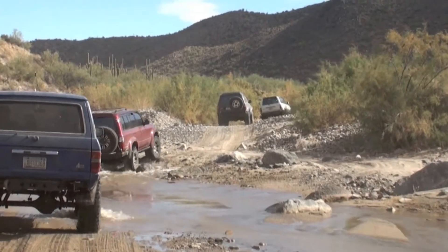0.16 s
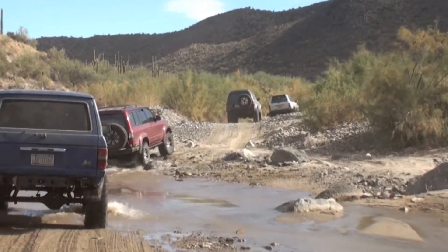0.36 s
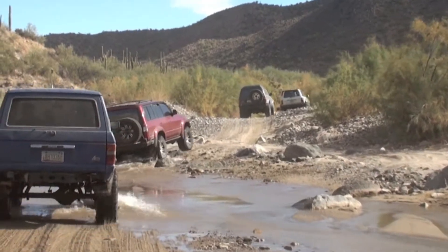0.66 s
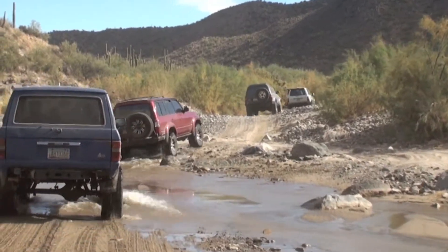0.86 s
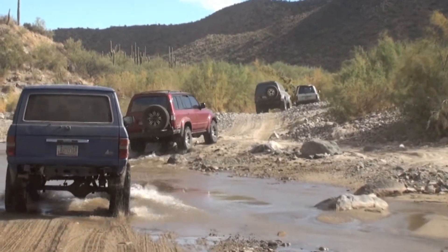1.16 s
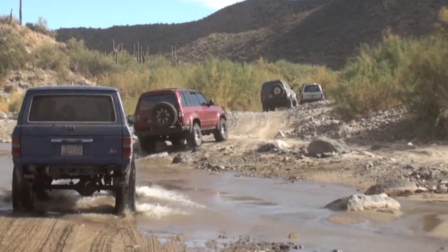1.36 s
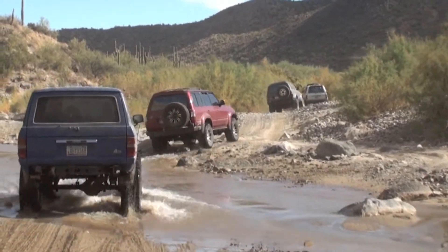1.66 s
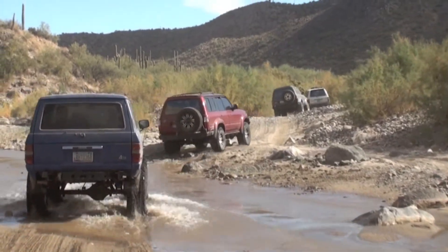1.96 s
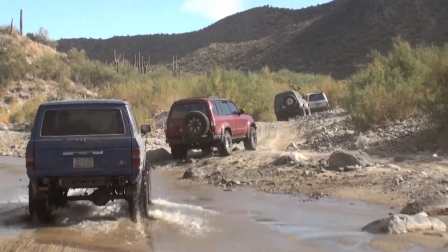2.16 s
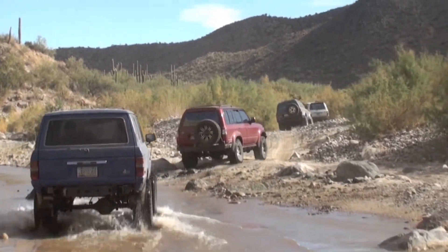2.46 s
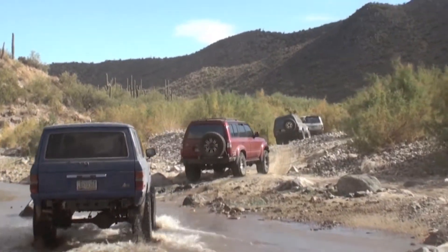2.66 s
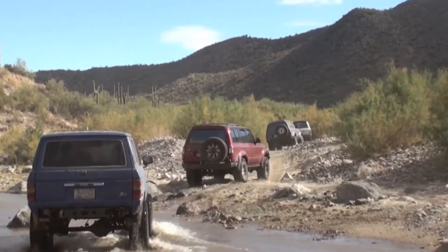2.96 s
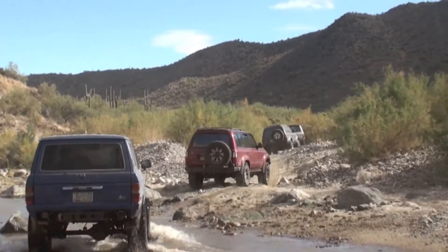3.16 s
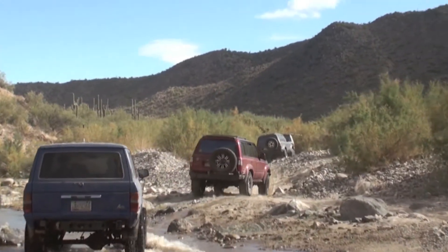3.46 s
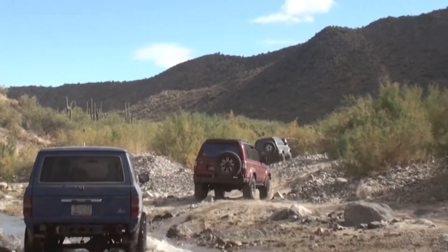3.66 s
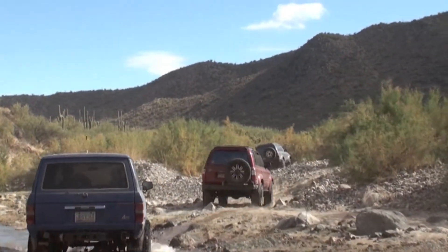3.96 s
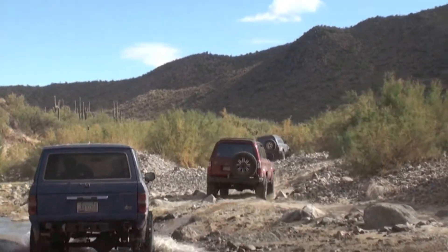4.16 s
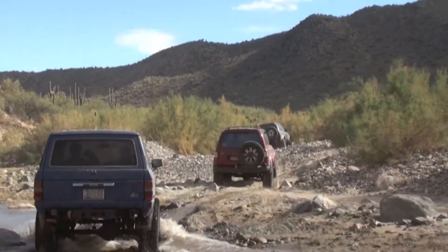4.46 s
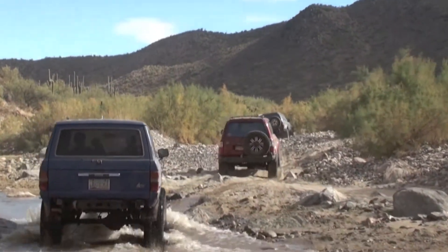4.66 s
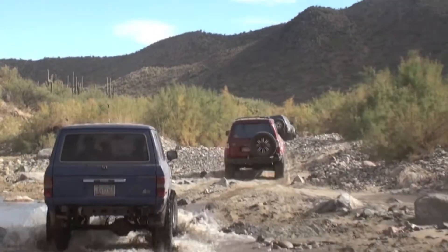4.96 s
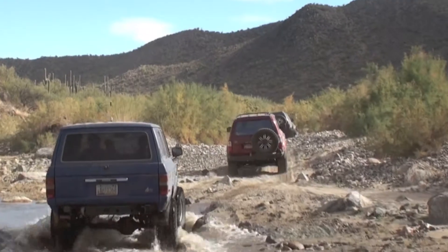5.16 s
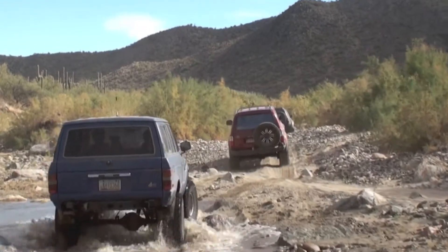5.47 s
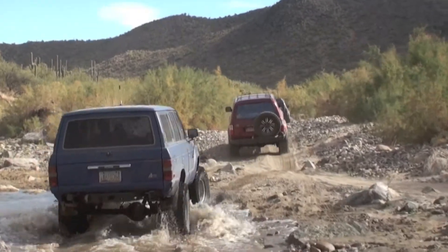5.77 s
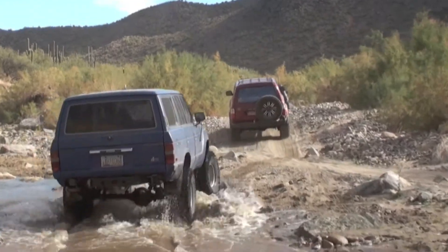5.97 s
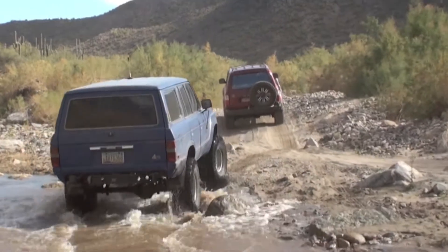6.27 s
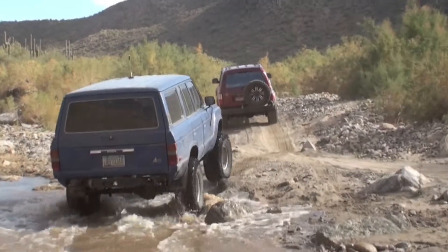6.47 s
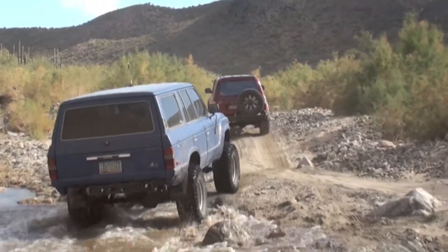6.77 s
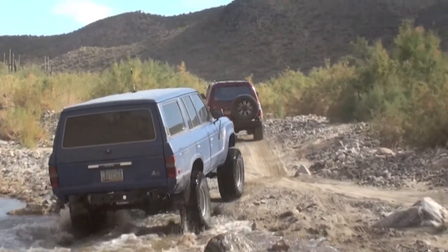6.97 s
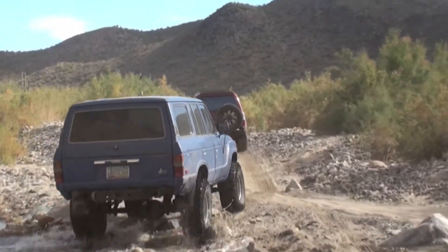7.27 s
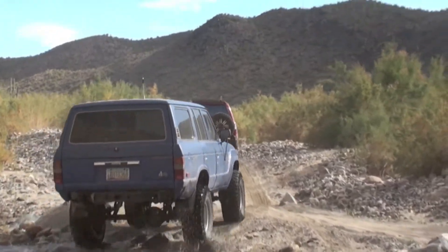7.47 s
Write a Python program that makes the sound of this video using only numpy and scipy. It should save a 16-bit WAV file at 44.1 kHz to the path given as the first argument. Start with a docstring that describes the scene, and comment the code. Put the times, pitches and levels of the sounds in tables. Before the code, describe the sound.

Inside the small, dry cabin of a four-wheel-drive crawling through a stony, shallow stream, in close stereo leaning slightly left. A low engine drone starts a little jerky, dips near 0.7 seconds, then swells and smooths, its pitch jumping around 1.5 and climbing until about 5, where it levels, wavers and gradually weakens. Floor rumble, a soft rush of tyres and water, faint air hiss and fine gritty spatter continue throughout. A small cluster of trim ticks comes at 1.1 to 1.3, with a knock at 1.5. From 2.4 bright ticks multiply; between 3.2 and 4.6 panel knocks crowd together over heavy low booms and louder ground noise. Short hollow tocks slide downward at 3.5, 4.3, 5.6 and 6.4, with tiny metal clinks near 4.1, 5.2 and 5.7. Scattered rattles, knocks at 6.1 and 7, and deep jolts persist until the end at 7.6.

```python
"""Inside a four-wheel-drive car that crawls over the stones of a river bed, in order of time.
From the start the engine drones as sine lines that climb with its speed, over filtered noise of floor, tyres,
water and air, spattering grains and a low boom that swells at each jolt. Loose trim ticks and body panels knock
as struck modes, at random and in set blows. From midway, falling tocks, hollow and slightly rough, mix with
a few clinks of small metal parts."""
import sys
import numpy as np
from scipy import signal
from scipy.fft import rfft, irfft, next_fast_len
from scipy.io import wavfile
from scipy.ndimage import uniform_filter1d, map_coordinates

SR = 44100
rng = np.random.default_rng(int(sys.argv[2]) if len(sys.argv) > 2 else 0)


def wav_record(signal):
    """Record a signal, one row per channel, as 16-bit PCM in the file named by sys.argv[1]."""
    frames = np.transpose(np.atleast_2d(signal))
    bounded = np.clip(frames, -1, 1)
    # unit amplitude maps onto the largest positive 16-bit level
    quanta = np.round(bounded * 32767).astype(np.int16)
    wavfile.write(sys.argv[1], SR, quanta)


N = 335601  # samples

# All table levels are relative; the mix sets the final gain.
# Engine speed. Each row: time in seconds, firing rate in Hz.
ENGINE_SPEED = [(0, 38.6), (.7, 40.6), (1.1, 42.2), (1.42, 43.8), (1.56, 47.6), (1.7, 50), (2.2, 53.6),
                (2.8, 56.7), (3.2, 57.9), (3.45, 59.1), (3.9, 60.6), (4.5, 62.3), (5.0, 63.5), (5.7, 62.7),
                (7.61, 63.3)]
# Engine load. Each row: time in seconds, level in dB, jerkiness from 0 to 1,
# gain of the upper multiples in dB, level of the in-between multiples in dB.
ENGINE_LOAD = [(0, -23, 1, 0, -45), (.35, -29, 0.7, 0, -45), (.7, -32, .1, 5, -46), (1.1, -27, 0, 2, -48),
               (1.42, -23, 0, -5, -47), (1.65, -25, 0, -5, -47), (1.79, -22, 0, -6, -47),
               (1.92, -24, 0, -1, -47), (2.2, -24, 0, 0, -42), (2.9, -25, 0, 0, -43),
               (3.4, -24, .2, 0, -43), (3.55, -27, .3, 2, -44), (4.2, -27.5, .4, 0, -39),
               (4.5, -30, .5, 0, -44), (5.0, -27, .6, -6, -47), (5.6, -29, .8, -6, -49),
               (6.4, -30, .9, -8, -44), (7.61, -34, .7, -6, -47)]
# Engine lines. Each row: multiple of the firing rate, level in dB.
WHOLE_MULTIPLES = [(1, 0), (2, 0), (3, -3), (4, 0), (5, -5), (6, -6)]
# In-between lines, from unequal cylinders. Each row: multiple of the firing rate, level in dB.
HALF_MULTIPLES = [(1.5, 0), (2.5, 0), (3.5, -2), (4.5, -4)]
# How the car body passes the engine's lines on. Each row: frequency in Hz, gain in dB.
BODY_SHELL = [(39, -14), (42, 0), (46, 1), (49, 2.5), (52, 0), (57, -3), (59.5, -11), (64, -14), (82, -14),
              (87, -9), (100, -6.5), (113, -10.5), (122, -9.5), (128, -13), (150, -24), (166, -21),
              (177, -15), (188, -28), (200, -17), (218, -12), (232, -28), (250, -23), (268, -15),
              (280, -15), (290, -9), (297, -11), (303, -21), (311, -12), (322, -10), (336, -11), (345, -24)]
# Ground noise. Each row: time in seconds, floor pan in dB, tyres and water in dB, air hiss in dB.
GROUND_LEVELS = [(0.0, -32, -42.5, -62), (0.3, -34.5, -43, -62.5), (1.1, -29.5, -43, -62),
                 (2.2, -29.5, -42, -62.5), (3.1, -28, -42, -60), (3.35, -24, -39, -58),
                 (3.69, -27, -41.5, -58), (4.24, -23, -38.5, -54.5), (4.56, -28, -41, -58.5),
                 (5.49, -32, -41.5, -61.5), (6.32, -28, -40.5, -58), (6.61, -31, -39.5, -60),
                 (7.2, -25.5, -39.5, -57.5), (7.61, -33, -40, -59)]
# Colour of the floor pan. Each row: frequency in Hz, density in dB per Hz.
PAN_SPECTRUM = [(12, -45), (20, -3.5), (48, -4), (72, -6), (97, -8), (145, -7), (176, -14.5), (225, -16.5),
                (325, -18), (381, -29.5), (439, -23.5), (600, -35), (780, -64), (1320, -120)]
# Colour of tyres and water. Each row: frequency in Hz, density in dB per Hz.
TYRE_SPECTRUM = [(150, -28), (250, -2.5), (413, -3.5), (511, -8), (726, -8), (898, -12), (1260, -13.5),
                 (1830, -21.5), (2270, -21.5), (2840, -26), (5000, -35), (6500, -40), (11000, -120)]
# Colour of the air hiss. Each row: frequency in Hz, density in dB per Hz.
AIR_SPECTRUM = [(1800, -38), (3000, -26), (3800, -22), (4500, -11.5), (6300, -9.5), (7600, -7.5),
                (10000, -11.5), (11800, -11.5), (13500, -12.5), (15300, -15.5), (16500, -39)]
# Stereo width of the noise. Each row: frequency in Hz, left-right likeness (1 is mono).
LIKENESS = [(60, 0.96), (99, 1), (160, 0.77), (270, 0.66), (450, 0.79), (740, 0.64), (1220, 0.75),
            (2010, 0.7), (3330, 0.65), (5500, 0.64), (10300, 0.61), (11600, 1)]
# Steady booming. Each row: time in seconds, cabin air in dB, sprung body in dB.
SWAY_LEVELS = [(0, -57, -42), (.7, -48, -48), (1.1, -57, -35), (2.3, -29, -45), (3, -39, -41),
               (3.3, -30, -28.5), (4.7, -26.5, -28), (5.6, -30, -35.5), (7.61, -26.5, -27.5)]
# Jolted wheels. Each row: centre in seconds, cabin air in dB, sprung body in dB,
# length in seconds, pitch of the cabin air in Hz.
WHEEL_JOLTS = [(0.126, -42, -29, 0.053, 41), (0.464, -30, -46, 0.066, 41.05),
               (0.902, -26, -26, 0.07, 40.95), (2.52, -18, -46, 0.049, 43.25), (2.648, -50, -38, 0.049, 44),
               (3.32, -25.5, -32, 0.12, 47.64), (3.512, -20.5, -16.5, 0.064, 43.94),
               (3.81, -22, -31, 0.046, 46), (4.01, -25, -20, 0.058, 48), (4.17, -14.5, -28, 0.036, 41),
               (4.265, -18, -19, 0.035, 41), (4.448, -20, -25.5, 0.061, 43), (4.654, -25.5, -34, 0.088, 42),
               (4.962, -17, -25.5, 0.082, 41.96), (5.25, -24, -30, 0.069, 40.87),
               (6.213, -23, -33, 0.068, 44.82), (6.564, -27, -25.5, 0.042, 38),
               (6.858, -18.5, -23, 0.061, 45), (7.128, -17, -26.5, 0.057, 45),
               (7.493, -35, -32, 0.12, 38.3)]
# Resonance of the cabin air. Each row: frequency in Hz, density in dB per Hz.
CABIN_AIR = [(20, -54), (34, -15), (40, -1.5), (43, 1.5), (47, -10), (54, -4.5), (90, -120)]
# Resonance of the body on its springs. Each row: frequency in Hz, density in dB per Hz.
SPRUNG_BODY = [(8, -40), (18, -14), (27, 5), (33, 1.5), (44, -15), (80, -120)]
# Ticks of loose trim. Each row: blow in seconds, peak in dB, treble gain in dB, mode struck hardest in Hz.
TRIM_TICKS = [(0.0169, -32, -15, 5650), (1.1218, -24, -8, 3800), (1.1998, -29.5, -5, 5650),
              (1.2179, -26, -11, 5650), (1.2473, -29.5, -7, 5650), (1.4962, -33.5, -13, 3800),
              (2.4076, -35, -3, 8600), (2.4766, -19.5, -4, 5650), (2.5324, -30.5, -6, 5100),
              (2.6327, -28.5, -5, 8600), (2.6483, -30, -8, 6700), (2.6849, -31.5, -8, 6700),
              (2.7384, -33, -2, 7500), (2.7674, -25.5, -9, 5650), (2.7813, -31, -5, 7500),
              (2.7977, -28, -7, 5650), (2.9247, -28.5, -9, 5650), (3.1832, -33, -9, 3800),
              (3.2752, -28, -15, 3800), (3.2848, -34, -9, 6700), (3.3849, -24, -4, 6700),
              (3.4187, -38, -2, 3800), (3.4823, -32, -7, 6700), (3.5403, -31, -15, 6700),
              (3.6355, -29.5, -1, 6700), (3.6688, -35, -10, 6700), (3.6893, -29, -3, 4400),
              (3.7286, -31, -7, 4400), (3.7944, -28.5, -11, 4400), (3.8659, -34, -9, 6700),
              (3.884, -29, -7, 5100), (3.9236, -28.5, -10, 6700), (3.9522, -32, -5, 5100),
              (4.0609, -36, -6, 5650), (4.1682, -38, -12, 5650), (4.2146, -31, -13, 3800),
              (4.2681, -37.5, -3, 5650), (4.2805, -40, -5, 6700), (4.3061, -35, 1, 3800),
              (4.3346, -32, -7, 6700), (4.3788, -37, -4, 7500), (4.4339, -37, -12, 7500),
              (4.6013, -33, 0, 5650), (4.7649, -31.5, -2, 5650), (4.7976, -31.5, -4, 5650),
              (4.8384, -40, -4, 6700), (4.8921, -34, -6, 6700), (4.9525, -30.5, -8, 6700),
              (5.0053, -29, -7, 6700), (5.0881, -28.5, -7, 6700), (5.1046, -28, -5, 6700),
              (5.2228, -28.5, -1, 6700), (5.2612, -27.5, -5, 6700), (5.4054, -36, -11, 4400),
              (5.5047, -33, -14, 3800), (5.522, -34, -3, 8600), (5.7558, -28.5, -3, 5650),
              (5.9658, -31, -9, 5650), (6.017, -40, -9, 5100), (6.0347, -33.5, -2, 3800),
              (6.0967, -27.5, -16, 3800), (6.1331, -26.5, -8, 6700), (6.2125, -29.5, -7, 5650),
              (6.2373, -34, -7, 3800), (6.3559, -37, -3, 3800), (6.5909, -37, -9, 5650),
              (6.839, -38, -13, 5100), (6.9172, -33.5, -10, 3800), (6.9522, -28, -3, 6700),
              (6.9896, -26.5, -1.5, 5650), (7.0339, -31.5, -12, 7500), (7.2653, -33.5, -5, 3800),
              (7.4536, -32, -13, 6700), (7.58, -31.5, -4, 5650)]
# Ring of the trim. Each row: frequency in Hz, level in dB.
TRIM_MODES = [(2000, 0.5), (2450, 0), (3100, -5), (3800, -0.5), (4400, -7), (5100, -0.5), (5650, 0),
              (6700, 1), (7500, 0), (8600, -3), (9500, 0), (10400, 0), (11300, 4), (12500, -3), (13700, -4),
              (15100, -18)]
# Knocks of the body. Each row: blow in seconds, peak in dB, upper-mode gain in dB, mode struck hardest in Hz.
BODY_KNOCKS = [(1.497, -24.5, -3, 2800), (2.947, -25, -12, 1850), (3.184, -31.5, 1, 3600),
               (3.278, -23, 0, 1450), (3.346, -38, -8, 2800), (3.45, -36, -13, 1450), (3.69, -29, 0, 4400),
               (3.92, -38, -10, 2050), (3.948, -30, -8, 1450), (4.028, -37, -6, 2050),
               (4.076, -30, 3, 3600), (4.106, -40, -10, 1450), (4.129, -35, -8, 2050),
               (4.146, -29, -3, 2450), (4.192, -39, -5, 2050), (4.214, -23, -2.5, 2050),
               (4.225, -31, -11, 2050), (4.281, -26, -18, 600), (4.311, -29.5, -13, 1450),
               (4.367, -28, -20, 1450), (4.432, -36, -17, 1450), (4.476, -29, -3, 3600),
               (4.536, -29.5, -26, 600), (5.965, -30, -19, 4400), (6.087, -33, -6, 2450),
               (6.098, -23.5, -6, 3600), (6.216, -29.5, -15, 1450), (6.673, -29.5, 3, 3600),
               (7.034, -26, -6, 1850), (7.265, -33, -9, 2050), (7.455, -27, 1, 2800)]
# Ring of the body panels. Each row: frequency in Hz, level in dB.
BODY_MODES = [(600, 15.5), (800, 7.5), (950, -1), (1150, -12), (1450, 11), (1850, 9), (2050, 5), (2450, 12),
              (2800, 3), (3100, 3), (3600, 2), (4400, -13)]
# Hollow falling tocks. Each row: start in seconds, level in dB, starting pitch in Hz, final pitch in Hz.
FALLING_TOCKS = [(3.51, -39, 1400, 1120), (4.306, -35, 2520, 1300), (4.362, -38, 2470, 1300),
                 (5.6, -30, 1600, 760), (6.423, -39, 1200, 1040)]
# Clinks of small metal parts. Each row: blow in seconds, peak in dB, top-mode gain in dB (idle: no mode
# is above the split), mode struck hardest in Hz.
METAL_CLINKS = [(4.1352, -23.5, -14, 11600), (5.1581, -26.5, -11, 14900), (5.662, -34, -6, 8750),
                (5.6722, -24.5, -6, 8750)]
# Ring of the metal parts. Each row: frequency in Hz, level in dB.
METAL_MODES = [(5200, -13), (7200, -8), (8750, 0.5), (9700, -2), (10600, -15), (11600, 1), (12400, -6),
               (13500, -13), (14300, -10), (14900, -1), (15500, -6)]
# Decay of the cabin. Each row: frequency in Hz, time to fall 60 dB in seconds.
CABIN_DECAY = [(500, 0.049), (4000, 0.12), (15000, 0.016)]

SMEAR_DB = 3  # lost under full jerk by each multiple above the second
HALF_GROWS_DB, HALF_FULL = 11, 0.17  # upper in-between lines rise with jerk, complete at this jerk
SPRUNG_HZ = 26.5  # swing of the body on its springs
# Spatter: median pitch, its spread in natural log units, decay in cycles, level at the largest size draw
SPATTER_HZ, SPATTER_SPREAD, SPATTER_CYCLES, SPATTER_DB = 1500, .7, 1.5, -49
LEAD_S, LEAD_DB = .003, -10.5  # brief soft noise rise into a blow
PRESS_DB, PRESS_T60 = -19, .03  # short grind after it, seconds to fall 60 dB
HARDEST_DB = 4  # gain of the mode struck hardest
TRIM_T60, METAL_T60, BODY_T60 = .0035, .0045, .006  # seconds for a mode to fall 60 dB
TOCK_T60, TOCK_RISE_S, TOCK_ROUGH = .03, .001, .5  # seconds of ringing, rise time, rms flutter
TOP_HZ = 16000  # upper limit of the whole sound


def amp(db):
    """Gain of a level in dB."""
    return 10 ** (np.asarray(db) / 20)


def unit(x):
    """x at rms 1."""
    return x / np.sqrt(np.mean(x ** 2) + 1e-20)


def along(points, hz):
    """Read (Hz, value) points on a log frequency axis."""
    f, v = np.transpose(points)
    return np.interp(np.log(hz + 1), np.log(f + 1), v)


def curves(rows):
    """One value per sample for each column after the time."""
    s, *cols = np.transpose(rows)
    return [np.interp(np.arange(N) / SR, s, c) for c in cols]


def wobble(rate):
    """A smooth random curve with this many knots a second."""
    knots = rng.standard_normal(int(N * rate / SR) + 4)
    return map_coordinates(knots, [np.arange(N) * rate / SR])


def filtered(x, response):
    """x times a response of frequency."""
    m = next_fast_len(N + SR // 2)
    return irfft(rfft(x, m) * response(np.fft.rfftfreq(m, 1 / SR)), m)[..., :N]


def engine():
    """Lines on multiples of the firing rate, whole ones coloured by the body; jerky load makes them waver."""
    (rate_hz,) = curves(ENGINE_SPEED)
    load_db, jerk, upper_db, half_db = curves(ENGINE_LOAD)
    wavering_hz = rate_hz * (1 + 0.01 * jerk * wobble(8))
    turn = 2 * np.pi * np.cumsum(wavering_hz) / SR
    calm_db = HALF_GROWS_DB * np.maximum(1 - jerk / HALF_FULL, 0)
    lines = []
    for k, db in WHOLE_MULTIPLES:
        tilt_db = (upper_db - SMEAR_DB * jerk * (k - 2)) * (k > 2)
        lines.append((k, load_db + db + along(BODY_SHELL, k * rate_hz) + tilt_db))
    for k, db in HALF_MULTIPLES:
        lines.append((k, half_db + db + (upper_db - calm_db) * (k > 3)))
    out = np.zeros(N)
    for k, db in lines:
        strength = np.sqrt(2) * amp(db + 1.6 * jerk * wobble(8))
        out += strength * np.sin(k * turn + k * k)  # k * k staggers the phases
    return out


def rush(spectrum, patchy_db):
    """Stereo noise of rms 1 whose gain varies in random patches of time and frequency."""
    z = signal.stft(rng.standard_normal((2, N)), nperseg=512)[2]
    field = uniform_filter1d(rng.standard_normal(z.shape[1:]), size=6, axis=0)
    field = uniform_filter1d(field, size=8, axis=1)
    pair = signal.istft(z * amp(patchy_db * unit(field)), nperseg=512)[1][:, :N]

    def mid_side(hz):
        angle = np.arccos(np.clip(along(LIKENESS, hz), -1, 1)) / 2
        return amp(along(spectrum, hz)) * [np.cos(angle), np.sin(angle)]

    mid, side = filtered(pair, mid_side)
    return unit(np.array([mid + side, mid - side]))


def ground():
    """Stones shake the floor pan, tyres churn gravel and water, air hisses past: three bands of noise."""
    pan_db, tyre_db, air_db = curves(GROUND_LEVELS)
    shake = wobble(22)  # shared by all three
    pan = amp(pan_db - 1.5 + 1.4 * shake) * rush(PAN_SPECTRUM, patchy_db=0.1)
    tyres = amp(tyre_db + 3.5 + 0.69 * shake + 0.52 * wobble(40)) * rush(TYRE_SPECTRUM, patchy_db=0.43)
    air = amp(air_db + .5 * shake) * rush(AIR_SPECTRUM, patchy_db=2)
    return pan + tyres + air


def spatter(count=1600):
    """Drops and grit hit the underside as short decaying sines, densest where the tyres are loud."""
    odds = np.cumsum(amp(4 * curves(GROUND_LEVELS)[1]))
    when, size, side = rng.random((count, 3)).T
    hz = (SPATTER_HZ * np.exp(SPATTER_SPREAD * rng.standard_normal(count)))[:, None]
    t = np.arange(SR // 100) / SR
    level = amp(SPATTER_DB - 5 * np.log(size + 1e-3))[:, None]  # small draws give the loud, rare grains
    grains = level * np.exp(-t * hz / SPATTER_CYCLES) * np.sin(2 * np.pi * hz * t)
    at = (np.searchsorted(odds, when * odds[-1])[:, None] + np.arange(len(t))).ravel()
    channels = []
    for share in (side, 1 - side):  # each grain leans to its own side
        weighted = grains * (.5 + share[:, None])
        channels.append(np.bincount(at, weighted.ravel(), N + SR)[:N])
    return np.array(channels)


def kicked(spectrum):
    """A low resonance kicked by noise, its swing partly evened out, rms 1."""
    x = filtered(rng.standard_normal(N), lambda hz: amp(along(spectrum, hz)))
    swing = np.abs(signal.hilbert(x, next_fast_len(N))[:N])
    return unit(x / (swing + 0.27 * swing.mean()) ** 0.39)


def boom():
    """Each jolt rings the cabin air and rocks the sprung body, swelling and dying over the steady sway."""
    t = np.arange(N) / SR
    air, body = amp(curves(SWAY_LEVELS))
    out = air * kicked(CABIN_AIR) + body * kicked(SPRUNG_BODY)
    phases = rng.random((len(WHEEL_JOLTS), 2))  # in turns
    for (s, air_db, body_db, length_s, air_hz), phase in zip(WHEEL_JOLTS, phases):
        turns = np.outer([air_hz, SPRUNG_HZ], t) + phase[:, None]
        swings = amp([[air_db], [body_db]]) * np.sin(2 * np.pi * turns)
        swell = np.exp(-((t - s) / length_s) ** 2)
        out = out + np.sqrt(2) * swell * swings.sum(axis=0)
    return out


def by_chance(modes, count, low_db, upper_db):
    """Faint blows of stones thrown up by the tyres, more where the tyres are loud; rows as struck() takes."""
    odds = np.cumsum(amp(5 * curves(GROUND_LEVELS)[1]))
    draws = rng.random((count, 4))
    start_s = np.searchsorted(odds, draws[:, 0] * odds[-1]) / SR
    hardest_hz = np.transpose(modes)[0][(draws[:, 3] * len(modes)).astype(int)]
    return np.column_stack([start_s, low_db + 8 * draws[:, 1], upper_db + 8 * draws[:, 2], hardest_hz])


def struck(events, modes, t60, split_hz, chatter_db, chatter_s, scatter_db):
    """Soft rise, sharp blow, grind and chatter ring modes of new strengths; each blow tints those above split_hz."""
    hz, db = np.transpose(modes)[:, :, None]
    out, t, lead = np.zeros(N + SR), np.arange(SR // 10) / SR, round(LEAD_S * SR)
    rise = amp(LEAD_DB) * (t / LEAD_S) ** 2
    grind = amp(PRESS_DB - 60 * (t - LEAD_S) / PRESS_T60)
    chatter = amp(chatter_db - 60 * t / chatter_s)
    force = np.where(t < LEAD_S, rise, grind + chatter)
    for s, peak_db, upper_db, hardest_hz in events:
        distance = np.abs(hz - hardest_hz)
        hardest = distance == distance.min()
        level_db = db + scatter_db * rng.standard_normal(hz.shape)
        level_db = level_db + (hz > split_hz) * upper_db + HARDEST_DB * hardest
        sign = np.sign(rng.standard_normal(hz.shape))
        ring = (amp(level_db - 60 * t / t60) * sign * np.sin(2 * np.pi * hz * t)).sum(axis=0)
        push = force * rng.standard_normal(len(t))
        push[lead] = 1  # the blow itself
        blow = signal.fftconvolve(push, ring)
        start = max(round(s * SR) - lead, 0)
        out[start:][:len(blow)] += amp(peak_db) * blow / np.abs(blow).max()
    return out[:N]


def trim_ticks():
    """Loose trim ticks through bright, very short modes."""
    events = [*TRIM_TICKS, *by_chance(TRIM_MODES, count=85, low_db=-52.0, upper_db=-9)]
    return struck(events, TRIM_MODES, TRIM_T60, split_hz=9000, chatter_db=-31, chatter_s=0.08, scatter_db=1.5)


def body_knocks():
    """Body panels knock through lower, slightly longer modes."""
    events = [*BODY_KNOCKS, *by_chance(BODY_MODES, count=340, low_db=-43, upper_db=-10)]
    return struck(events, BODY_MODES, BODY_T60, split_hz=1700, chatter_db=-22.5, chatter_s=0.1, scatter_db=1.5)


def tocks():
    """A damped, slightly rough tone whose pitch slides down as the contact softens."""
    out, t = np.zeros(N + SR), np.arange(SR // 20) / SR
    for s, level_db, from_hz, to_hz in FALLING_TOCKS:
        hz = to_hz + (from_hz - to_hz) * np.exp(-t / 0.00687)
        flutter = np.convolve(rng.standard_normal(len(t)), np.hanning(len(t) // 30), 'same')
        rough = 1 + TOCK_ROUGH * unit(flutter)
        envelope = amp(level_db - 60 * (t / TOCK_T60) ** 2) * (1 - np.exp(-t / TOCK_RISE_S))
        tone = np.sin(2 * np.pi * np.cumsum(hz) / SR)
        out[round(s * SR):][:len(t)] += rough * envelope * tone
    return out[:N]


def metal_clinks():
    """Small metal parts clink through high modes."""
    return struck(METAL_CLINKS, METAL_MODES, METAL_T60, split_hz=19000,
                  chatter_db=-23, chatter_s=0.07, scatter_db=1.5)


def cabin(x):
    """The cabin's short answer, different at each side; each frequency dies at its own speed."""
    hz, t, z = signal.stft(rng.standard_normal((2, SR // 4)), SR, nperseg=128)
    decay = amp(-60 * t / along(CABIN_DECAY, hz)[:, None])
    tail = signal.istft(z * decay, SR, nperseg=128)[1]
    delayed = np.pad(x, (60, 0))[None]  # 60 samples
    return signal.fftconvolve(delayed, tail / np.linalg.norm(tail[0]), axes=1)[:, :N]


def rattles():
    """Trim, panels, tocks and metal, each blow heard direct with the cabin's answer behind it."""
    hits = trim_ticks() + body_knocks() + tocks() + metal_clinks()
    return amp(0.5) * hits + amp(-7.5) * cabin(hits)


def scene():
    """Everything is a little louder on the left, the boom most."""
    bright = engine() + ground() + spatter() + rattles()
    return bright * amp([[.3], [-.3]]) + boom() * amp([[.6], [-.6]])


def record(dry):
    """Cut everything from the band limit up."""
    return filtered(dry, lambda hz: hz < TOP_HZ)


dry = scene()
out = record(dry)
wav_record(out)
```